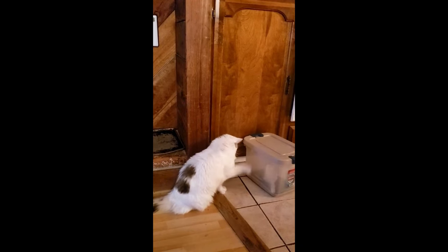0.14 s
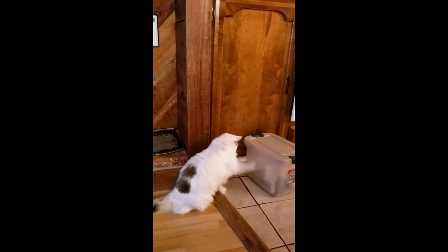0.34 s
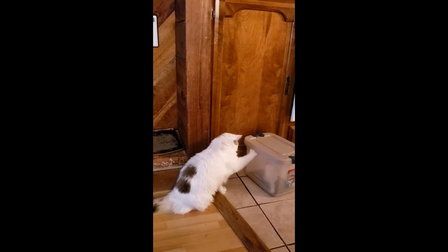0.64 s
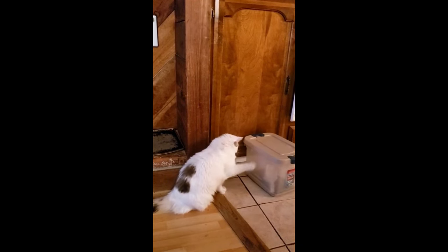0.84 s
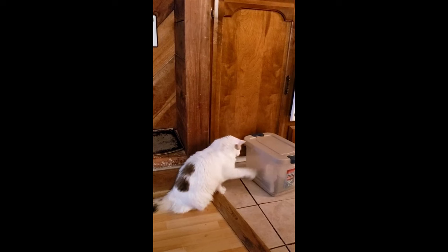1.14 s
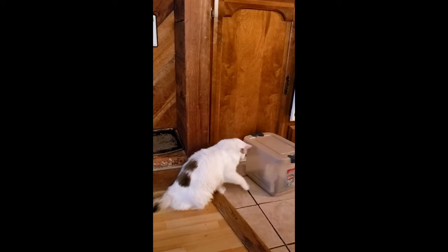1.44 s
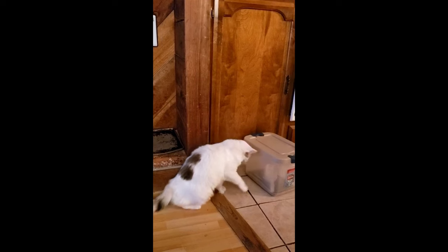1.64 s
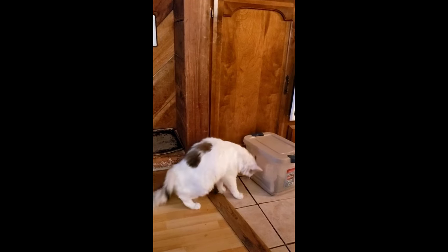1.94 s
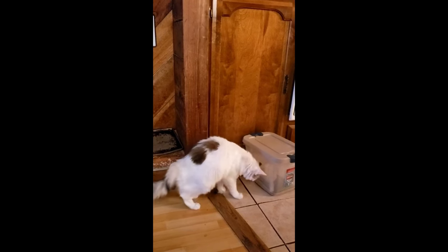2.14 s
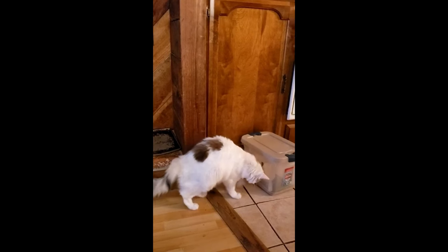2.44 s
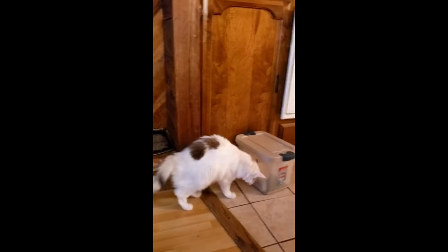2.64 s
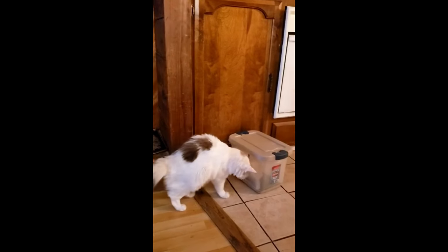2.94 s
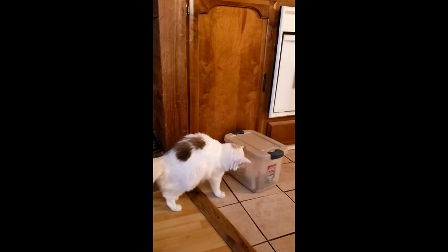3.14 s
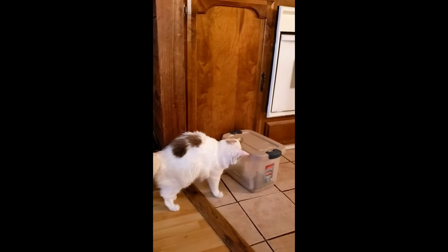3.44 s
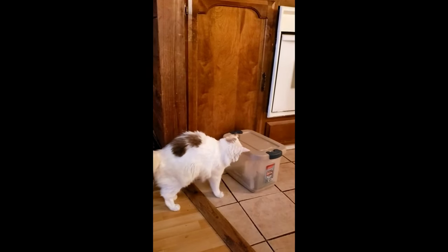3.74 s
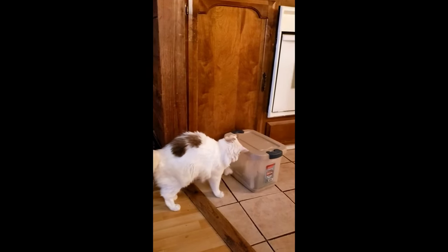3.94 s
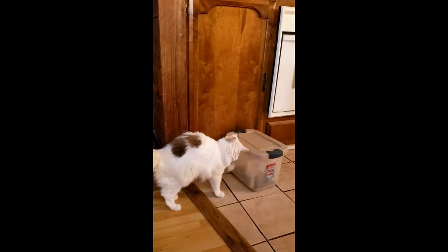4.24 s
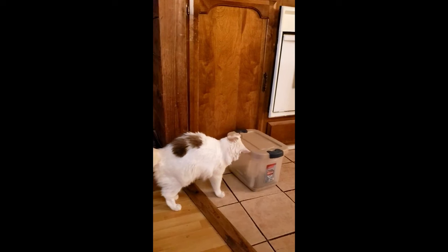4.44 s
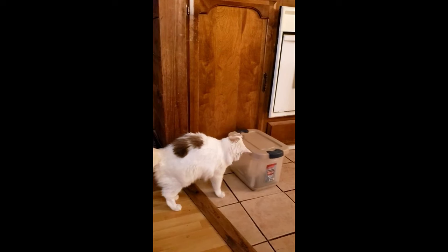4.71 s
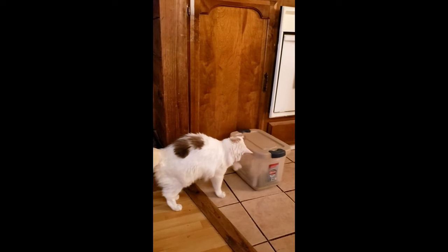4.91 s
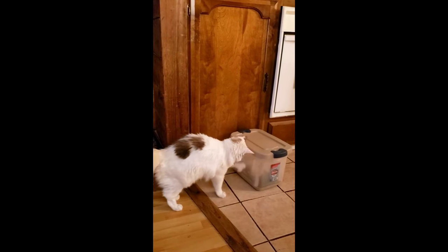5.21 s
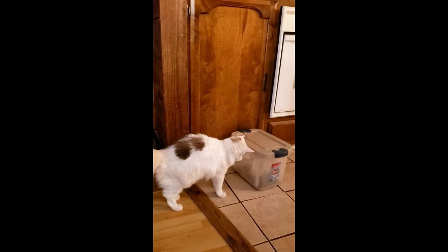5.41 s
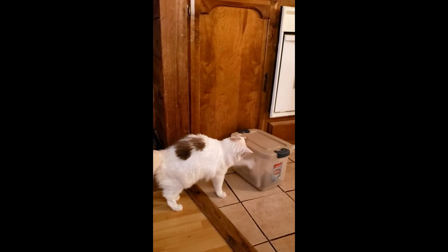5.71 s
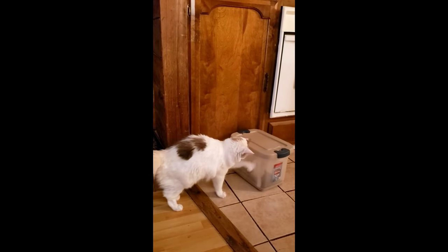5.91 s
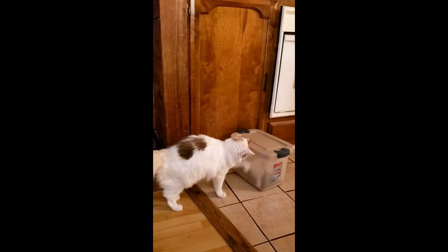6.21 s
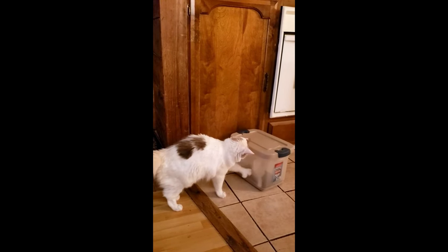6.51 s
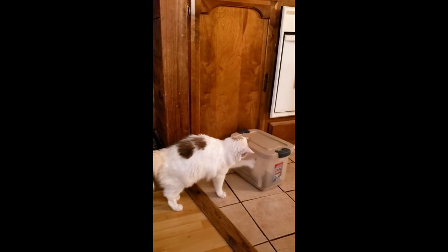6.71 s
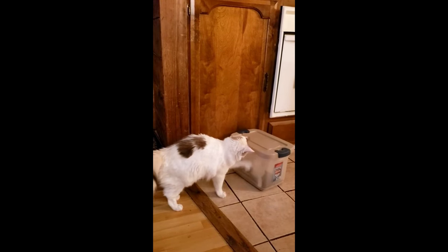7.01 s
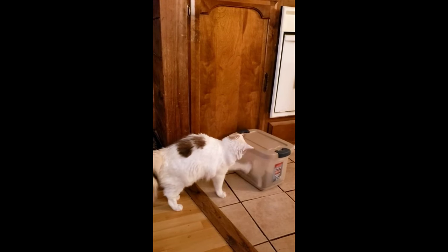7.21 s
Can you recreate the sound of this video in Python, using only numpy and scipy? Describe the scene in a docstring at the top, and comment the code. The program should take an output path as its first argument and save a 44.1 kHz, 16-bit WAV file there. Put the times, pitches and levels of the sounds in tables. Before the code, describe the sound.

A cat paws at a hollow plastic bin on a tiled kitchen floor. Soft low thuds with claw clicks and short scrapes come in the first second and a half, one knock strongest; then mostly quiet with a few light bumps. A dense flurry of drumming and scratching follows, thinning to faint touches. Close phone microphone, lively hard room, low appliance hum and faint hiss.

```python
"""Cat pawing at a plastic bin

A tiled kitchen, the phone's microphones a few steps from a half-empty storage bin that a cat paws at.
Soft pads drum the bin: short swells of its lowest mode, each with a jolt that rings floor and room.
Claws tick on it (bursts of tiny contacts through the plastic's modes) and drag down it (stick-slip grains).
The hard room rings on after each touch; behind, an appliance hums (sines and narrow noise)
and the house rumbles and hisses (patchy coloured noise)."""
import sys
import numpy as np
from scipy import signal
from scipy.fft import rfft, irfft
from scipy.io import wavfile
from scipy.ndimage import uniform_filter1d

SR = 44100
rng = np.random.default_rng(int(sys.argv[2]) if len(sys.argv) > 2 else 0)


def dump_mix(stems):
    """Bounce the given channels to the path in sys.argv[1] as a 16-bit WAV at rate SR."""
    frames = np.atleast_2d(stems).T  # one column per channel
    limited = np.clip(frames, -1, 1)  # hard clip at full scale
    pcm = np.round(limited * 32767).astype(np.int16)
    wavfile.write(sys.argv[1], SR, pcm)


N = 324576


def amp(db):
    """Decibels to amplitude."""
    return 10 ** (np.asarray(db) / 20)


def evened(x):
    """Scales x to an rms of 1."""
    return x / np.sqrt(np.mean(x ** 2) + 1e-20)


def read(points, hz):
    """Reads a curve of (frequency, value) points along log frequency."""
    f, value = np.transpose(points)
    return np.interp(np.log(hz + 1), np.log(f + 1), value)


def add(mix, start_s, sound):
    """Lays a sound into the mix from start_s on, cut at the end."""
    part = mix[..., round(start_s * SR):][..., :sound.shape[-1]]
    part += sound[..., :part.shape[-1]]


def coloured(x, spectrum):
    """Shapes x by a spectrum in dB."""
    gain = amp(read(spectrum, np.fft.rfftfreq(x.shape[-1], 1 / SR)))
    return irfft(rfft(x) * gain, x.shape[-1])


def ring(x, hz, width_hz):
    """One damped resonance of about unit gain at its peak; a wider one dies sooner."""
    pole = np.exp((2j * np.pi * hz - np.pi * width_hz) / SR)
    return 2 * signal.lfilter([1 - abs(pole)], [1, -pole], x).real


# Phase by which the left port leads the right: (frequency [Hz], lead [rad])
PORT_LEAD = [(400, .1), (700, .8), (1000, .2), (1500, -1.1), (2800, -.9), (4200, -2.4), (5200, -2.8),
             (6000, 0)]


def ports(a, b, likeness, lean):
    """Two microphone ports: the left hears a, the right a share of a and the rest from b, shifted in phase."""
    hz = np.fft.rfftfreq(N, 1 / SR)
    share = np.clip(read(likeness, hz), -1, 1)
    tilt = amp(read(lean, hz) / 2)
    left = rfft(a)
    right = share * left + np.sqrt(1 - share ** 2) * rfft(b)
    right = right * np.exp(-1j * read(PORT_LEAD, hz))
    return irfft(np.array([left * tilt, right / tilt]) * 2 / (tilt + 1 / tilt), N)


# Colour of the house's rumble and hiss: (frequency [Hz], density [dB per Hz, relative])
HOUSE_AIR = [(20, -63), (50, -1), (100, -6.5), (200, -5), (340, -11), (650, -20), (1000, -24), (1600, -35),
             (4000, -41), (5800, -46), (6800, -43), (8800, -52), (12000, -41.5), (15300, -38.5)]
AIR_DB = -39.5  # rms into the ports


def house_air():
    """Rumble and hiss: noise whose level is patchy over time and frequency, one draw for each port."""
    frames, hz = N // 512 + 5, np.fft.rfftfreq(2048, 1 / SR)
    re, im, patch = rng.standard_normal((3, 2, frames, 1025)).swapaxes(2, 3)
    patch = uniform_filter1d(patch[0], size=9, axis=0)
    patch = evened(uniform_filter1d(patch, size=9, axis=1))
    level_db = read(HOUSE_AIR, hz)[:, None] + 1.84 * patch
    noise = signal.istft((re + 1j * im) * amp(level_db), nperseg=2048, noverlap=1536)[1]
    return amp(AIR_DB) * evened(noise[:, :N])


# Lines of the appliance's hum: (frequency [Hz], level before the steady and wavering shares [dB])
HUM_LINES = [(59.5, -39.5), (119.5, -37), (172, -40.5), (205, -37.5), (241, -41), (347, -43.5)]
WAVER_WIDTH_HZ = 14.8


def appliance_hum():
    """Each hum line is a steady sine plus noise rung twice at its pitch, so its level wavers."""
    hum, t = np.zeros((2, N)), np.arange(N) / SR
    for hz, db in HUM_LINES:
        steady = np.sqrt(2) * np.sin(2 * np.pi * (hz * t + rng.random()))
        waver = ring(rng.standard_normal((2, N)), hz, WAVER_WIDTH_HZ)
        waver = evened(ring(waver, hz, WAVER_WIDTH_HZ))
        hum += amp(db) * (0.32 * steady + 0.43 * waver)
    return hum


# How long the hard room rings: (frequency [Hz], time to fall 60 dB [s])
ROOM_T60 = [(100, 0.32), (400, 0.7), (1000, 0.68), (3000, 0.4), (6000, 0.49), (13000, 0.34)]


def room(x):
    """Two unrelated tails of sparse random echoes, each band dying at its own speed."""
    echoes = np.zeros((2, SR))
    at = np.arange(200, SR - 20, 20) + rng.integers(0, 20, (2, (SR - 201) // 20))
    np.put_along_axis(echoes, at, rng.choice([-1., 1.], at.shape), 1)
    echoes *= 1 - 0.45 * np.exp(-np.arange(SR) / SR / 0.0032)  # they take a few ms to build up
    hz, t, z = signal.stft(echoes, SR, nperseg=256)
    decay = amp(-60 * t / read(ROOM_T60, hz)[:, None])
    tail = signal.istft(z * decay, SR, nperseg=256)[1]
    return signal.fftconvolve(x[None], tail / np.linalg.norm(tail[0]), axes=1)[:, :N]


# Modes of the bin's plastic, rung by drags and taps: (frequency [Hz], width [Hz], level [dB])
WALL_MODES = [(480, 250, 4), (750, 300, 4), (1195, 260, 5), (1550, 260, 4), (1850, 260, 4), (2400, 300, 6),
              (2850, 300, 6), (3200, 350, 5), (3700, 450, 3), (4300, 500, 2.5), (5000, 450, 2.5)]
# Colour of the dull rub: (frequency [Hz], density [dB per Hz, relative])
RUB_COLOUR = [(240, -14), (400, -4), (819, 3.5), (1630, -2.5), (1840, -2), (3430, -6.5), (5010, -14),
              (7400, -11), (9000, -64), (11700, -62), (19800, -120)]
# Colour of the bright fizz: (frequency [Hz], density [dB per Hz, relative])
FIZZ_COLOUR = [(7500, -57), (9000, -13), (11000, -8.5), (13000, 0.5), (15500, 4.5), (20000, 17)]
# Paws dragging down the wall: (time of hardest pressure [s], rub level [dB], fizz over rub [dB],
# time to press [s], time to let go [s])
STROKES_DOWN = [(0.0, -44.5, 8, .02, 0.11), (0.224, -36.5, -18, 0.017, 0.071),
                (0.312, -42.5, 10, 0.071, 0.1), (0.648, -38.5, 0, 0.11, 0.16),
                (0.703, -24, 4, 0.011, 0.048), (0.77, -43.5, 14.5, 0.066, 0.15),
                (3.863, -26.5, 2, 0.063, 0.056), (4.168, -31, -13, 0.092, 0.099),
                (4.223, -29.5, 10.5, 0.062, 0.091), (4.471, -37, 1, 0.18, 0.36),
                (4.53, -53, 32, 0.02, 0.21), (4.75, -39.5, -16, 0.26, 0.23),
                (4.833, -26, 12.5, 0.074, 0.28), (5.176, -31.5, -6, 0.073, 0.17),
                (5.288, -34, 9, .02, 0.099), (5.395, -31.5, 19.5, 0.036, 0.2), (5.7, -52.5, 7, 0.2, 0.18),
                (6.35, -47.5, 11, 0.13, 0.19)]
LIFT_DB = -33  # how far a stroke rises and falls over those times
JUDDER_DB, JUDDER_S = 3.0, .008  # rms swing and smoothing time of the grip


def drags():
    """Fur and claws stick and slip: dense uneven grains, partly ringing the wall; strokes press and let go."""
    slips = rng.standard_normal((2, N)) * amp(5.1 * np.minimum(rng.exponential(1, (2, N)), 4))
    slips[0] *= 1 + 2.65 * (rng.random(N) < 300 / SR)  # a claw catches, some 300 times a second
    rub = evened(coloured(slips[0], RUB_COLOUR))
    wall = evened(sum(amp(db) * ring(slips[0], hz, width) for hz, width, db in WALL_MODES))
    rub = evened(rub + 0.27 * wall)
    fizz = evened(coloured(slips[1], FIZZ_COLOUR))
    t = np.arange(N) / SR
    rub_press, fizz_press = np.zeros((2, N))
    for s, db, fizz_db, press_s, release_s in STROKES_DOWN:
        away = np.where(t < s, (s - t) / press_s, (t - s) / release_s)
        press = amp(db + LIFT_DB * np.minimum(away, 4))
        rub_press += press
        fizz_press += amp(fizz_db) * press
    # the grip comes and goes along a stroke
    grip = evened(uniform_filter1d(rng.standard_normal(N), size=round(JUDDER_S * SR)))
    return rub_press * amp(JUDDER_DB * grip) * rub + fizz_press * fizz


# Claws striking: (time [s], knock level [dB], spot struck [Hz], spread [octaves, at least 0.15 is used],
# tick over knock [dB], fizz over knock [dB])
CLAW_TAPS = [(0.193, -0.6, 2930, 1.3, -14.5, -50), (0.303, -24, 1310, 0.93, 3, -35),
             (0.587, -5, 1610, 0.53, -40, -50), (0.616, -12, 1450, 1.05, -26, -47),
             (0.699, 4, 2430, 0.17, -13.5, -30), (0.712, -9.5, 5150, 0.12, -11, -25),
             (0.886, -8, 1740, 0.49, -19.5, -39), (1.015, -20.5, 1090, 1.3, -3.5, 12),
             (1.206, 11.5, 2640, 0.73, -11.5, -51), (1.219, 9.5, 2080, 1.1, -31, -9.5),
             (2.563, -11.5, 1150, 0.9, -41, -50), (2.636, -19.5, 1880, 1.3, -10, -40),
             (3.689, -25.5, 1770, 0.26, -12, -15), (3.853, -5.5, 1440, 1.3, -4, -50),
             (4.154, -5, 4300, 0.55, -13, -50), (4.216, -2, 2430, 0.36, -11.5, -44),
             (4.461, -7.5, 2200, 1, 0.5, -48), (4.525, 3.5, 2600, 0.6, -7, 3.5),
             (4.719, -23, 2800, .9, -14, -39), (4.767, -1, 4000, 0.12, -8.5, -8),
             (4.808, 12, 1530, 1.3, -12, 5), (5.015, -14, 3700, 0.23, -21, -40),
             (5.054, -9, 2800, 0.31, -13, -50), (5.071, -6.5, 2760, 0.59, -6.5, -42),
             (5.105, -15, 4200, 0.56, -13, -40), (5.16, -14, 2630, 0.82, -23, -33),
             (5.178, -14, 3700, 0.5, -2, 11), (5.242, -4.5, 1080, 1.1, -14, -44),
             (5.287, -9.5, 1240, 0.95, -23, 7.5), (5.321, -27, 1640, .7, -8, 12),
             (5.364, -9, 1690, 0.62, -14.5, -25), (5.388, 1.5, 1450, 1.05, -8.5, 5),
             (5.466, -5.5, 1540, 1.2, -8, -29), (5.604, -20.5, 1380, .65, -9, -32),
             (5.705, -28.5, 1080, .85, 4.5, -12), (5.882, -31.5, 1050, 1.1, -14, 9),
             (6.09, -24, 1130, 1.3, 0, 15), (6.246, -12, 2570, 0.29, -38, -50),
             (6.343, -19.5, 3870, 1.3, -1, 10.5), (6.358, -17, 2860, 0.5, -3, -27)]
FAR_DB = -21.5  # level of the modes far from the spot struck
CONTACT_S, BITE_S = .003, .0012  # the burst's decay constant and rise
CLICK = 3.4  # height of the click added to the burst


def taps():
    """A click and a burst of tiny contacts ring the modes near the spot struck and spray treble.
    Row 0 goes straight to the microphone. The room hears all sides of the bin at once,
    so row 1, which feeds it, is the plain click, evener in colour."""
    out, t = np.zeros((2, N)), np.arange(2048) / SR
    tick_band = signal.butter(6, [4200, 7700], "band", fs=SR, output="sos")
    fizz_band = signal.butter(5, 11000, "high", fs=SR, output="sos")
    burst_shape = np.minimum(t / BITE_S, 1) * np.exp(-t / CONTACT_S)
    bursts = rng.standard_normal((len(CLAW_TAPS), 3, 2048)) * burst_shape
    click = 1. * (np.arange(2048) == round(BITE_S * SR))
    strikes = np.stack([bursts + CLICK * click, 0 * bursts + click], axis=2)
    for (s, db, spot_hz, spread, tick_db, fizz_db), strike in zip(CLAW_TAPS, strikes):
        knock = np.zeros((2, 2048))
        for k, (hz, width, mode_db) in enumerate(WALL_MODES):
            octaves = np.log2(hz / spot_hz)
            near_db = max(-6 * (octaves / max(spread, .15)) ** 2, FAR_DB)
            knock += (-1) ** k * amp(mode_db + near_db) * ring(strike[0], hz, width)
        tick = signal.sosfilt(tick_band, strike[1])
        fizz = signal.sosfilt(fizz_band, strike[2])
        # the fizz beams away: weaker on the direct path than into the room
        beamed_db = np.array([[fizz_db - 6.0], [fizz_db]])
        tap = np.zeros((2, 2048))
        for part, part_db in ((knock, 0), (tick, tick_db), (fizz, beamed_db)):
            tap += amp(part_db) * part / np.linalg.norm(part, axis=1, keepdims=True)
        add(out, s, amp(db) * tap)
    return out


# Pads drumming the wall: (time [s], level of the push [dB], wall pitch [Hz], push length [ms])
PAD_THUDS = [(0.204, -21.5, 179, 14), (0.592, -18.5, 174, 24), (0.647, -12.5, 180, 9.8),
             (0.7, -11.5, 193, 6.9), (0.771, -16, 174, 11), (0.889, -20, 182, 8.2), (1.079, -30, 178, 5.4),
             (1.209, -12.5, 239, 12), (1.227, -0.5, 174.3, 6.8), (1.257, -21, 183, 7.5),
             (1.336, -19.5, 178.3, 16), (1.402, -24, 196, 16), (1.478, -20, 188, 6.9),
             (2.561, -18.5, 196, 12), (2.739, -34, 208, 17), (3.057, -24.5, 183, 9.9),
             (3.687, -21, 194, 9.7), (3.854, -24, 154, 8.9), (4.051, -12.5, 193, 7.6),
             (4.22, -10.5, 170, 6.5), (4.259, -15, 169, 6.7), (4.374, -10, 175.4, 8.3),
             (4.531, -15, 136, 9.5), (4.572, -12.5, 172, 12), (4.663, -7.5, 201.5, 7.8),
             (4.809, -8.5, 204, 8.8), (4.879, -14, 168, 16), (4.968, -7, 191, 9.8), (5.16, -16.5, 180, 16),
             (5.18, -6.5, 171.6, 9.2), (5.25, -13.5, 168.2, 20), (5.292, -16, 225, 13.8),
             (5.339, -17.5, 166.5, 11), (5.459, -22.5, 170, 6.9), (5.534, -15, 169.7, 15.7),
             (5.607, -19, 180, 8.9), (5.649, -22.5, 191, 7.1), (6.213, -19.5, 178, 12.4),
             (6.266, -26, 187, 15), (6.328, -28.5, 136, 11), (6.378, -22, 206, 10.3),
             (7.23, -32, 193, 13.5)]
# Low modes of floor and room: (frequency [Hz], width [Hz], level [dB])
FLOOR_MODES = [(59.9, 3.6, 18.5), (114.4, 6.7, 13.5), (257, 67, 6.5), (325.4, 36, 9.5), (410, 620, 4)]
JOLT_DB, JOLT_PER_DB = -17, 0.48  # the jolt into the floor for a 0 dB push, and how it grows with the push
JOLT_S, JOLT_LAG_S = 0.0016, 0.0016  # the jolt's time to peak, and its start after the push


def thuds():
    """Each soft push swells the wall's lowest mode for a few cycles and jolts the floor."""
    wall, floor, t = np.zeros(N), np.zeros(N), np.arange(6000) / SR
    v = t / JOLT_S
    jolt = (v * np.exp(1 - v)) ** 3
    for (s, db, hz, ms), sign in zip(PAD_THUDS, rng.choice([-1, 1], len(PAD_THUDS))):
        u = t / (ms / 1000)
        swell = u * np.exp((1 - u ** 2) / 2)
        add(wall, s - JOLT_LAG_S, amp(db) * swell * np.sin(2 * np.pi * hz * t))
        add(floor, s, amp(JOLT_DB + JOLT_PER_DB * db) * sign * jolt)
    return wall, sum(amp(db) * ring(floor, hz, width) for hz, width, db in FLOOR_MODES)


# Left-right likeness of the house, the direct sound and the room's answer: (frequency [Hz], likeness [-1 to 1])
LIKE_HOUSE = [(100, 1), (260, 0.6), (500, 1), (1100, 0.014), (5900, 0.034), (6300, 0.69), (9000, 1)]
LIKE_DIRECT = [(260, 1), (600, 0.28), (2500, 0.94), (4000, 0.083), (6000, 0.79), (9000, 0.86)]
LIKE_ROOM = [(150, 1), (300, 0.94), (600, 0.51), (2500, 0.17), (5000, 0.9), (9000, 1)]
# Left port over right, for the house and for the bin: (frequency [Hz], level difference [dB])
LEAN_HOUSE = [(60, 7), (110, 12), (200, 4.5), (380, 12), (700, 15), (1290, 9), (2380, 1.4), (4400, 2.7),
              (8120, 1.6), (15000, 5.1)]
LEAN_BIN = [(60, 4.5), (110, 6.2), (200, 5.2), (380, 8.5), (700, 14), (1290, 11.5), (2380, 1.7),
            (4400, 20.5), (8120, 7.8), (15000, 13.6)]


def scene():
    """The house behind, the bin direct to the ports, and the room's answer to it."""
    (pads, boom), (claws, all_sides), rubs = thuds(), taps(), drags()
    low = pads + boom
    wet = amp(-6.0) * room(low) + amp(-3.0) * room(all_sides) + amp(-7.0) * room(rubs)
    near = low + rubs + claws
    late = np.roll(near, 9)  # part reaches the right port 9 samples later, round the phone's body
    direct = ports(near, late, LIKE_DIRECT, LEAN_BIN)
    answer = ports(*wet, LIKE_ROOM, LEAN_BIN)
    return direct + answer + ports(*(house_air() + appliance_hum()), LIKE_HOUSE, LEAN_HOUSE)


EDGE_HZ = 15900  # upper band limit


def record(dry):
    """The microphone drops the deepest bass, the input stage rounds off the loudest peaks; then the band limit."""
    bass_cut = signal.butter(2, 38, "high", fs=SR, output="sos")
    heard = amp(6.5) * signal.sosfilt(bass_cut, dry)
    soft = .95 * np.tanh(heard / .95)
    band_limit = signal.firwin(511, EDGE_HZ, window=("kaiser", 9), fs=SR)
    return signal.oaconvolve(soft, band_limit[None], "same")


dry = scene()
out = record(dry)
dump_mix(out)
```